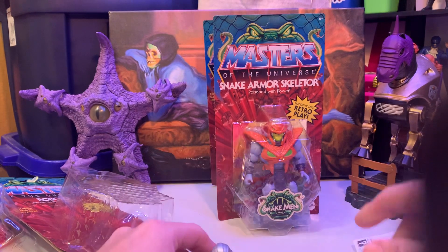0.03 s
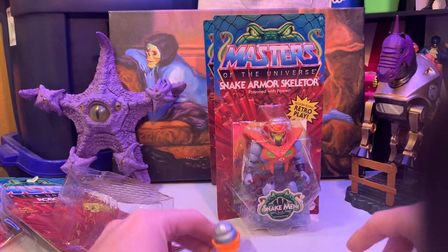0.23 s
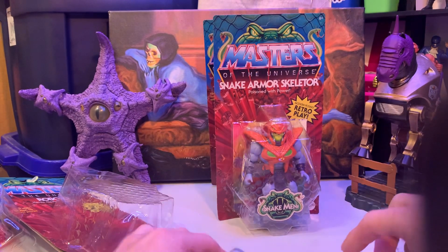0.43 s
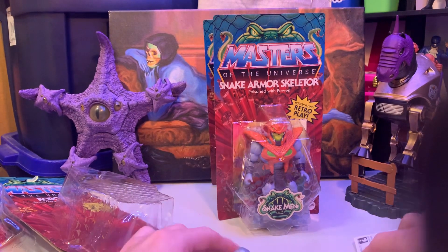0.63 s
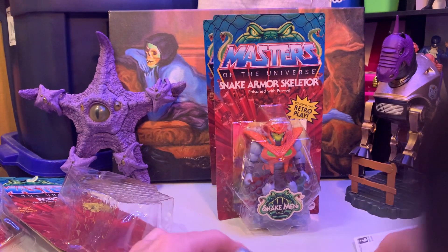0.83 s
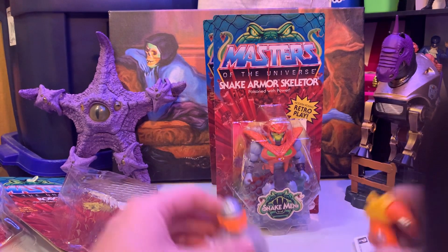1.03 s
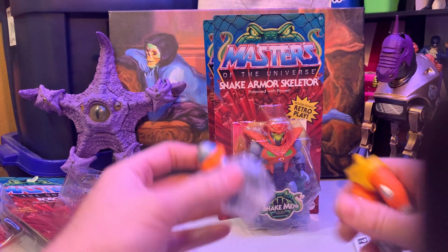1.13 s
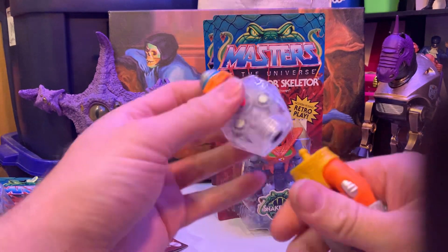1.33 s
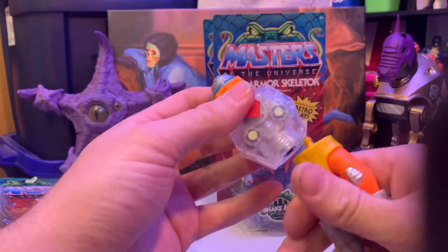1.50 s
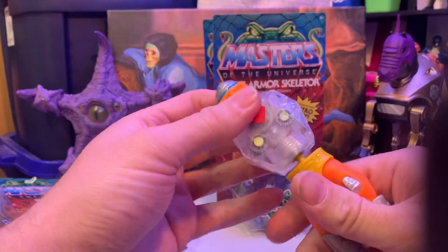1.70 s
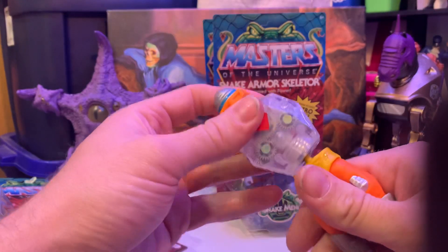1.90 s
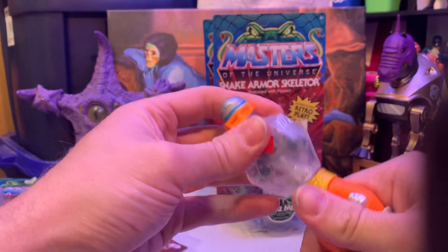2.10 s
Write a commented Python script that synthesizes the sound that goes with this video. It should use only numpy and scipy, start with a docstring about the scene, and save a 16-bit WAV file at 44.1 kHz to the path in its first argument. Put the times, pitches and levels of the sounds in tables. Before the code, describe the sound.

Plastic toy pieces knock and scrape on a tabletop before joining with one sharp snap.

```python
"""Hard plastic toy parts on a table in a small, quiet room, close to a stereo microphone.
Hands rustle and bump the table; the hollow parts knock and clatter, ringing themselves and the table top.
One drags, scrapes and squeaks as it sticks and slips. Then, held up to the microphone over a faint hum,
two parts rub and tick as a peg catches at the rim of its socket. It goes home with one sharp snap,
and the grip creaks softly."""
import sys
import numpy as np
from scipy import signal
from scipy.fft import rfft, irfft, next_fast_len
from scipy.io import wavfile
from scipy.ndimage import uniform_filter1d

SR = 44100
rng = np.random.default_rng(int(sys.argv[2]) if len(sys.argv) > 2 else 0)


def to_wav(s):
    """Save 16-bit WAV."""
    ch = np.atleast_2d(s).T  # columns
    pcm = np.round(np.clip(ch, -1, 1) * 32767)  # PCM
    wavfile.write(sys.argv[1], SR, pcm.astype(np.int16))


N = 94815
RING_SAMPLES = 16384
OPPOSITE = np.array([[1], [-1]])  # plus on the left, minus on the right
TABLE_LIKENESS, JOINT_LIKENESS, BASS_LIKENESS = 0.23, 0.093, 0.88  # left-right correlation


def undb(db):
    """Decibels to gain."""
    return 10 ** (np.asarray(db) / 20)


def unit(x):
    """Scale each channel to unit energy."""
    return x / np.sqrt(np.sum(x ** 2, axis=-1, keepdims=True))


def fade(t60):
    """Exponential decay, 60 dB down after t60 seconds."""
    return np.exp(-np.log(1000) * np.arange(RING_SAMPLES) / SR / t60)


def colour(x, points):
    """Minimum-phase filter through (Hz, dB) points."""
    hz, db = np.array(points, float).T
    n = 2 * next_fast_len(x.shape[-1])
    bin_hz = np.arange(n // 2 + 1) * SR / n
    gain = undb(np.interp(np.log(bin_hz + 1), np.log(hz), db))
    cepstrum = irfft(np.log(gain))
    cepstrum[1:n // 2] *= 2
    cepstrum[n // 2 + 1:] = 0
    return irfft(rfft(x, n) * np.exp(rfft(cepstrum)))[..., :x.shape[-1]]


def pair(likeness, size):
    """Left and right noise, partly alike."""
    mid, side = rng.standard_normal((2, size))
    return (np.sqrt(1 + likeness) * mid + np.sqrt(1 - likeness) * side * OPPOSITE) / np.sqrt(2)


def diffuse(alike_below_hz=290):
    """Noise reaching the microphone from all sides: left and right alike in the bass, unrelated above."""
    mid, side = rng.standard_normal((2, RING_SAMPLES))
    side = signal.sosfilt(signal.butter(4, alike_below_hz, "high", fs=SR, output="sos"), side)
    return mid + side * OPPOSITE


def burst(points, t60, likeness):
    """Dense, quickly dying vibration of one contact."""
    return unit(colour(pair(likeness, RING_SAMPLES) * fade(t60), points))


def ring(modes, scatter_db=3.0, detune=0.0033, turn=0.6, apart_hz=500, rise_cycles=0.37):
    """Modes struck once; weights shift with the contact point, higher modes differ between the sides."""
    t = np.arange(RING_SAMPLES) / SR
    out = np.zeros((2, RING_SAMPLES))
    for k, (hz, db, t60) in enumerate(modes):
        weight, tuning, side = rng.standard_normal(3)
        envelope = undb(db + scatter_db * weight) * fade(t60) * (1 - np.exp(-t * hz / rise_cycles))
        stereo_phase = turn * min((hz / apart_hz) ** 2, 1) * np.sign(side) * OPPOSITE
        out += envelope * np.sin(2 * np.pi * hz * (1 + detune * tuning) * t + stereo_phase + np.pi * k)
    return unit(out)


def add(out, s, x):
    """Place a sound at s seconds; unit energy counts as 0 dB over 10 ms."""
    i = int(s * SR)
    out[:, i:i + x.shape[1]] += x[:, :N - i] * np.sqrt(SR / 100)


def pan(x, db):
    """Make the left side db louder than the right."""
    return x * undb(OPPOSITE * db / 2)


def through(x, response):
    """Pass a sound through a resonator or a room."""
    return signal.fftconvolve(x, response, axes=-1)[:, :N]


def follow(x, curve):
    """Make a steady sound's level follow (seconds, dB) points."""
    s, db = np.array(curve).T
    return unit(x) * np.sqrt(N) * undb(np.interp(np.arange(N) / SR, s, db))


def friction(curve, likeness, slips_per_s=10000, spread_db=2):
    """Tiny random slips whose level follows a curve."""
    slips = (rng.random(N) < slips_per_s / SR) * undb(spread_db * rng.exponential(size=N))
    return follow(slips * pair(likeness, N), curve)


def body(points):
    """Unit-energy response with the given spectrum."""
    return unit(colour(signal.unit_impulse(2048)[None], points))


def band(curve, hz, t60):
    """A single resonance, shaken at random, whose level follows a curve."""
    return follow(through(pair(0.17, N), ring([(hz, 0, t60)])), curve)


# Room tone at the microphone. Each row: frequency in Hz, relative level in dB.
AIR_COLOUR = [(20, -14), (40, -2.5), (80, 0.5), (150, -5), (260, -15.5), (450, -27.5), (800, -45),
              (1300, -30.5), (2000, -47), (4400, -34), (7200, -48.5), (9000, -36), (12000, -60.5),
              (14000, -38), (16000, -62.5)]


def air(level_db=-60.5, split_hz=250):
    """Quiet room: a rumble alike on both sides and a faint diffuse hiss."""
    rumble = signal.sosfilt(signal.butter(2, split_hz, fs=SR, output="sos"), pair(BASS_LIKENESS, N))
    hiss = signal.sosfilt(signal.butter(2, split_hz, "high", fs=SR, output="sos"), pair(.3, N))
    return unit(colour(rumble + hiss, AIR_COLOUR)) * np.sqrt(N) * undb(level_db)


# Hands close to the microphone, a little to the right. Each row: time in seconds, level in dB.
RUSTLE = [(0, -55), (.05, -67), (.1, -81), (.79, -70.5), (.83, -64.5), (1.0, -80), (1.2, -81), (1.39, -70),
          (1.42, -58), (1.52, -71), (1.6, -78.5), (1.8, -104.5), (1.97, -84.5), (2.08, -69.5),
          (2.15, -66.5)]
RUB = [(.785, -105), (.795, -74), (.825, -67), (.88, -61.5), (.96, -66.5), (1.04, -73), (1.11, -61),
       (1.2, -74), (1.3, -74.5), (1.335, -68), (1.375, -86), (1.42, -57), (1.48, -61.5), (1.58, -70),
       (1.65, -73), (1.675, -55), (1.71, -72.5), (1.79, -77), (1.84, -64.5), (1.885, -63.5), (1.94, -88.5)]
CREAKS = [(.926, -62), (1.951, -76), (1.977, -71.5), (1.999, -77), (2.03, -68.5), (2.05, -72.5),
          (2.08, -83), (2.108, -69.5), (2.128, -59), (2.132, -62)]
# Their spectra. Each row: frequency in Hz, relative level in dB.
RUSTLE_COLOUR = [(80, -5.5), (220, 3.5), (400, 4.5), (600, 1.5), (900, 2), (1500, -0.5), (2500, -16.5),
                 (6000, -37)]
RUB_COLOUR = [(200, -11), (800, -14.5), (1400, -7.5), (2000, 3), (3200, 4.5), (4700, 7), (6200, -4.5),
              (7200, -9), (8800, -5), (10500, -8), (12000, -29), (14000, -8.5), (16000, -22)]
CREAK_COLOUR = [(200, -21), (1400, 13.5), (3000, 8.5), (4800, 2), (6500, -30), (16000, -25)]


def hands(presses_per_s=30, uneven_db=2.2):
    """Moving hands rustle, fingertips slide over plastic with uneven pressure and the grip creaks."""
    hold = int(SR / presses_per_s)
    steps = np.repeat(rng.standard_normal(N // hold + 1), hold)
    pressure = undb(uneven_db * uniform_filter1d(steps, hold)[:N])
    out = through(friction(RUSTLE, likeness=0.1), body(RUSTLE_COLOUR))
    out += through(friction(RUB, likeness=0.1) * pressure, body(RUB_COLOUR))
    for s, db in CREAKS:
        add(out, s, undb(db) * burst(CREAK_COLOUR, t60=0.023, likeness=0.47))
    return pan(out, db=-1.0)


# A hand bumping the table near the microphone. Each row: start in seconds, level in dB.
BUMPS = [(0.075, -50), (0.166, -45.5), (0.48, -37.5), (0.549, -43), (0.6, -47), (0.666, -37.5),
         (0.712, -41.5), (0.754, -37), (0.792, -36), (0.804, -36.5), (0.848, -38.5), (.88, -40),
         (0.907, -47), (1.16, -49.5), (1.624, -47.5), (1.706, -52), (1.905, -54), (2.133, -42.5)]
# The spectrum of a bump. Each row: frequency in Hz, relative level in dB.
BUMP_COLOUR = [(20, -25.5), (48, 1), (75, 4), (115, -9), (170, -16), (260, -27), (500, -42), (2000, -74)]


def bumps():
    """Dull thumps of a hand on the table."""
    out = np.zeros((2, N))
    for s, db in BUMPS:
        add(out, s, undb(db) * burst(BUMP_COLOUR, t60=0.039, likeness=BASS_LIKENESS))
    return out


# Parts knocking on the table, close and almost centred.
# Each row: start in seconds, ring of the part in dB, thud of the table in dB, contact crack in dB.
KNOCKS = [(0.147, -61.5, -57.5, -73), (0.178, -67, -49, -88), (0.186, -55, -62, -65),
          (0.2117, -28, -44, -48), (0.2131, -41.5, -47, -52), (.232, -41, -56, -62.5),
          (0.259, -56, -55.5, -75), (0.3515, -38, -43.5, -59), (0.369, -41.5, -47.5, -84),
          (0.391, -50.5, -55, -90), (0.445, -29.5, -25, -31.5), (0.4477, -24, -29, -39.5),
          (0.4529, -27.5, -30, -32), (0.4639, -34, -34, -35.5), (0.465, -25.5, -29, -32.5),
          (.4683, -28.5, -29, -33.5), (0.474, -35.5, -35, -47.5), (.487, -39, -35.5, -49.5),
          (.822, -56, -67, -74)]
# Modes of the hollow part, the table top and the part's stiff wall.
# Each row: frequency in Hz, relative level in dB, time to fall 60 dB in seconds.
PART_MODES = [(1052, 2, .04), (1105, 0, .035), (1141, -10, .07), (1228, -17, .09), (1352, -19, .08),
              (1617, 1, .033), (1655, 3, .024), (1718, -3, .045), (1825, -14, .035), (2010, -15, .028),
              (2250, -8, .028), (2435, -14, .05), (2614, -16, .05), (2920, -9, .02)]
TABLE_MODES = [(68, -5, .16), (108, -12, .12), (170, -1, .1), (226, -4, .12), (335, -6, .1), (388, 0, .16),
               (416, -3, .13), (470, -7, .16), (550, -5, .16), (609, -2, .16), (660, -15, .16),
               (840, -5, .19), (886, -8, .1), (1228, -4, .13), (1450, -4, .12)]
WALL_MODES = [(4314, 0, .025), (4696, -1, .025), (6600, -12, .02), (7900, -9, .02)]
# Spectra of the contact noise. Each row: frequency in Hz, relative level in dB.
PART_COLOUR = [(300, -22.5), (800, -16.5), (1080, 7.5), (1350, -9), (1660, 18), (1950, -7), (2350, -3.5),
               (3300, -4.5), (7000, -23.5), (16000, -57)]
TABLE_COLOUR = [(25, -23), (70, -14.5), (170, 7), (270, -1.5), (420, 0.5), (600, -16.5), (850, 4),
                (1500, -18), (6000, -63)]
CRACK_COLOUR = [(500, -35.5), (2300, -6), (3500, -1.5), (4600, 14), (6000, 2), (7200, -1.5), (8500, 3),
                (10500, 4.5), (12000, -19.5), (14000, -4), (16000, -21)]


def knocks():
    """Each knock cracks at the contact, rings the hollow part and thuds the table."""
    out = np.zeros((2, N))
    for s, ring_db, thud_db, crack_db in KNOCKS:
        part_noise = burst(PART_COLOUR, t60=.028, likeness=TABLE_LIKENESS)
        part = unit(ring(PART_MODES, turn=0.45) + undb(-5) * part_noise)
        table_noise = unit(colour(diffuse() * fade(t60=.12), TABLE_COLOUR))
        thud = unit(ring(TABLE_MODES, turn=0.76) + undb(-2.5) * table_noise)
        wall = ring(WALL_MODES, detune=0.014, turn=0.25)
        crack = unit(burst(CRACK_COLOUR, t60=.012, likeness=-0.1) + undb(-5) * wall)
        add(out, s, undb(ring_db) * part + undb(thud_db) * thud + undb(crack_db) * crack)
    return pan(out, db=-0.24)


# A part, the palm and the part's edge sliding on the table, close up.
# Each row: time in seconds, level in dB.
DRAG = [(0, -74), (.04, -95), (.08, -99), (.14, -90), (.17, -57.5), (.26, -67.5), (.31, -71), (.42, -70),
        (.443, -27.5), (.5, -62), (.565, -58), (.59, -48.5), (.625, -50), (.652, -48), (.69, -83),
        (.8, -74), (.825, -58.5), (.93, -85.5), (1.05, -70), (1.2, -98)]
PALM = [(.13, -71.5), (.155, -51), (.27, -55), (.32, -65), (.66, -53), (.81, -73), (.87, -69.5), (.93, -58),
        (.97, -72), (2.1, -85.5), (2.145, -53.5)]
SCRAPE = [(.555, -107), (.565, -77), (.59, -65.5), (.615, -65.5), (.638, -53), (.665, -64), (.70, -106)]
# Spectra of the soft palm and the bright edge. Each row: frequency in Hz, relative level in dB.
PALM_COLOUR = [(60, -8.5), (150, -5.5), (235, -3.5), (330, -8.5), (600, -19.5), (3000, -62)]
SCRAPE_COLOUR = [(1000, -7), (2400, 3), (3600, 5.5), (5000, 7), (7200, -10.5), (9000, -7), (12000, -25.5),
                 (15000, -29)]


def drag():
    """Slips of a part shake the same modes as the knocks; the palm brushes along and an edge scrapes."""
    part_and_table = ring(PART_MODES) + undb(-0.5) * ring(TABLE_MODES)
    slide = through(friction(DRAG, TABLE_LIKENESS), part_and_table)
    palm = through(friction(PALM, BASS_LIKENESS), body(PALM_COLOUR))
    scrape = through(friction(SCRAPE, likeness=0.25), body(SCRAPE_COLOUR))
    return slide + palm + scrape


# A short squeak on the table top. Each row: time in seconds, level in dB.
SQUEAK = [(.59, -80), (.625, -72), (.648, -44), (.664, -37), (.682, -86), (.7, -100)]


def squeak():
    """The dragged part sticks and slips, shaking one resonance."""
    return band(SQUEAK, hz=1645, t60=.055)


# The peg catching and slipping at the rim of its socket, held up to the microphone.
# Each row: start in seconds, tick in dB, pitch ratio, edge crack in dB, body jolt in dB.
PEG_TICKS = [(0.8645, -49.5, 1.2, -67, -83), (0.87, -54.5, 1.38, -70, -80), (1.4126, -74, 1.04, -93, -53),
             (1.4414, -46, 0.95, -49, -48.5), (1.4442, -36, 1.15, -47, -51.5),
             (1.447, -46.5, 1.16, -43, -50), (1.4631, -38, 0.967, -69, -55.5),
             (1.4663, -42.5, 1.5, -60.5, -66), (1.5155, -52, 0.93, -89, -62.5),
             (1.5959, -42, .92, -58.5, -67), (1.6796, -43, 0.81, -56.5, -58),
             (1.8225, -62.5, 0.74, -75, -69)]
# Modes of the finger-damped peg and of the socket.
# Each row: frequency in Hz, relative level in dB, time to fall 60 dB in seconds.
PEG_MODES = [(3180, -7, .009), (4050, 0, .011), (4520, -4, .008), (5050, -3, .008), (5950, -1, .007),
             (6850, -5, .005)]
SOCKET_MODES = [(2854, -13, .009), (3930, -11, .007), (4560, 3, .008), (4600, -13, .025), (5170, -10, .015),
                (5660, -16, .015), (8520, -11, .018)]
# Spectra of the joint's noise, the crack and the jolt. Each row: frequency in Hz, relative level in dB.
JOINT_COLOUR = [(800, -38), (2200, -26.5), (2900, -11), (3400, -5.5), (4500, -1.5), (5800, -3), (7000, -20),
                (10000, -36.5), (16000, -49.5)]
EDGE_COLOUR = [(2000, -26), (4500, 7), (6000, 6), (7200, -14), (8500, 5), (10000, 4), (11000, -8.5),
               (11900, -28.5), (14000, -7.5), (16000, -25.5)]
BODY_COLOUR = [(100, -20), (350, -5.5), (520, -35.5), (700, -32), (1000, -4), (1450, 0), (2200, -8),
               (4000, -24.5), (12000, -53)]


def joint(snap_s=1.6873, seat_delay_s=.0007, left_lead_s=.00045):
    """The peg ticks, pitched by where it is gripped, then cracks free and strikes the socket's bottom."""
    out = np.zeros((2, N))
    for s, tick_db, pitch, edge_db, body_db in PEG_TICKS:
        modes = [(hz * pitch, db, t60) for hz, db, t60 in PEG_MODES]
        noise = burst(JOINT_COLOUR, t60=0.012, likeness=JOINT_LIKENESS)
        tick = unit(ring(modes, detune=0.016, turn=0.83) + undb(-1) * noise)
        add(out, s, undb(tick_db) * tick + edge_slip(edge_db, body_db))
    noise = burst(JOINT_COLOUR, t60=0.012, likeness=JOINT_LIKENESS)
    socket = unit(ring(SOCKET_MODES, detune=0.0016, turn=0.49) + undb(-12) * noise)
    add(out, snap_s, edge_slip(edge_db=-30, body_db=-51))
    add(out, snap_s + seat_delay_s, undb(-24) * socket)
    out[1] = np.roll(out[1], int(left_lead_s * SR))
    return pan(out, db=-2)


def edge_slip(edge_db, body_db):
    """The bright crack of a slipping edge and the dull jolt of the part behind it."""
    crack = burst(EDGE_COLOUR, t60=0.022, likeness=JOINT_LIKENESS)
    jolt = burst(BODY_COLOUR, t60=0.045, likeness=JOINT_LIKENESS)
    return undb(edge_db) * crack + undb(body_db) * jolt


# A faint hum in the background of the room. Each row: time in seconds, level in dB.
HUM = [(.9, -99), (1.0, -64), (1.1, -76), (1.35, -73.5), (1.6, -77), (1.72, -63), (1.8, -90)]


def hum():
    """A narrow, wavering band of noise that swells twice."""
    return band(HUM, hz=1250, t60=0.012)


def room(x, near_db, tail_db, near_gap_s=0.0037, wall_gap_s=0.019, split_hz=2500):
    """Direct sound, quick reflections from table and boxes, then a short tail whose treble dies first."""
    t = np.arange(RING_SAMPLES) / SR
    near = unit(diffuse() * fade(t60=0.06) * (t > near_gap_s))
    walls = diffuse() * (t > wall_gap_s)
    low = signal.sosfilt(signal.butter(1, split_hz, fs=SR, output="sos"), walls)
    tail = unit(low * fade(t60=0.2) + (walls - low) * fade(t60=0.13))
    return x + through(x, undb(near_db) * near + undb(tail_db) * tail)


def scene():
    """All the handling in the small room; parts held up to the microphone sound drier."""
    handling = room(hands() + knocks() + drag() + squeak(), near_db=-6.5, tail_db=-18)
    held_close = room(joint(), near_db=-9.5, tail_db=-24)
    return air() + bumps() + handling + held_close + hum()


def record(dry):
    """The recorder cuts the top steeply above 16.1 kHz."""
    return signal.sosfilt(signal.ellip(10, .2, 80, 16100, fs=SR, output="sos"), dry)


dry = scene()
out = record(dry)
to_wav(out)
```